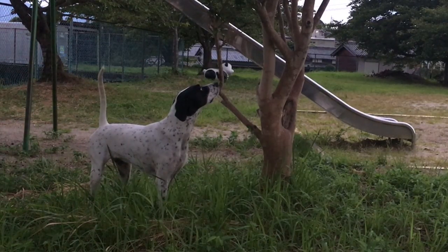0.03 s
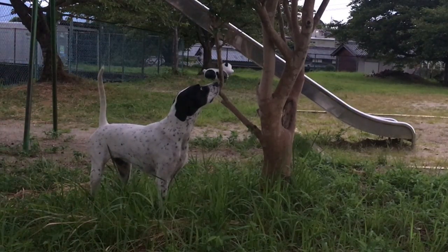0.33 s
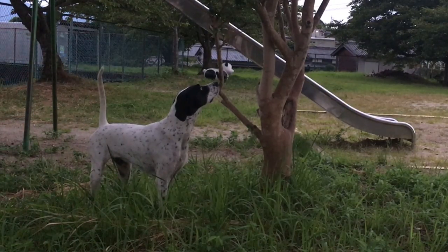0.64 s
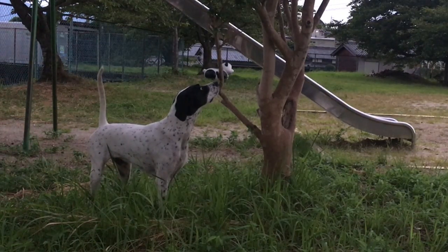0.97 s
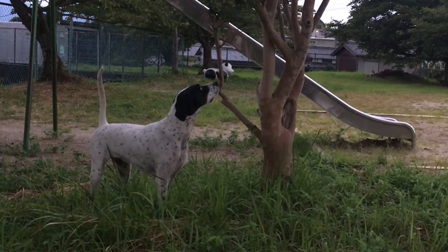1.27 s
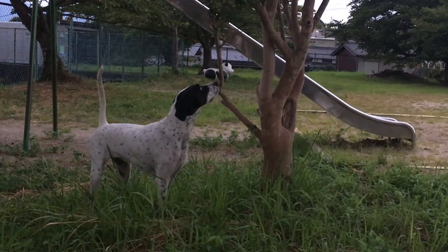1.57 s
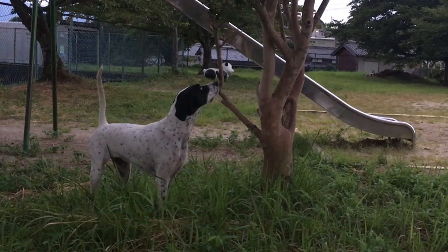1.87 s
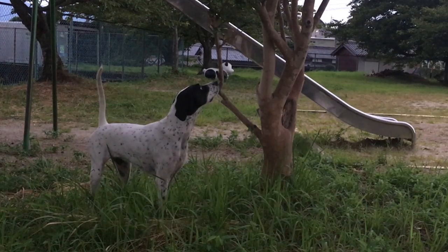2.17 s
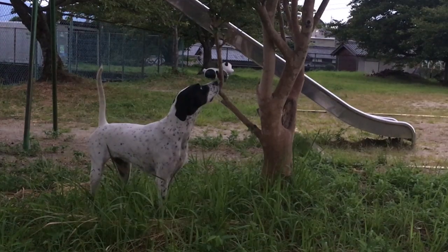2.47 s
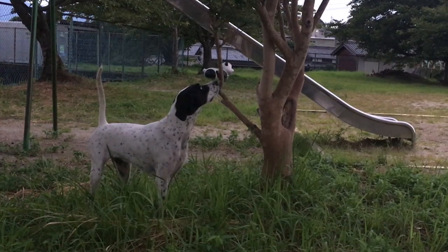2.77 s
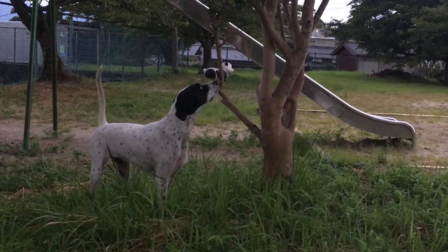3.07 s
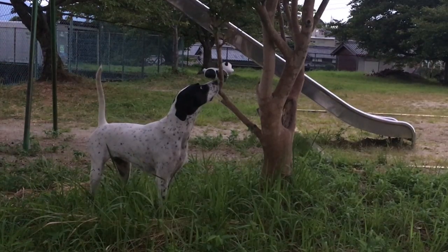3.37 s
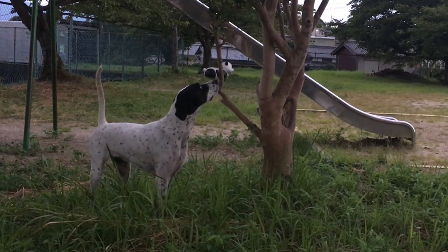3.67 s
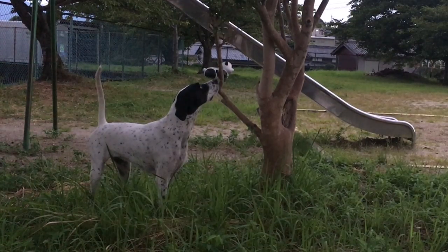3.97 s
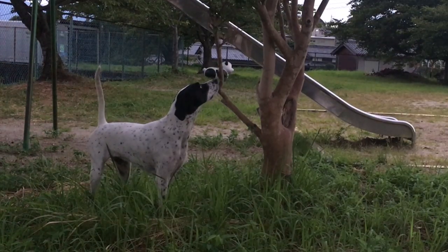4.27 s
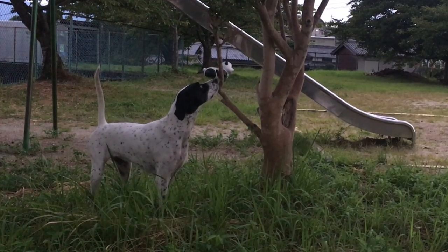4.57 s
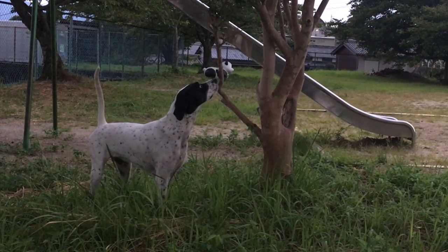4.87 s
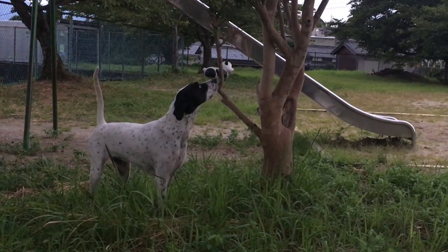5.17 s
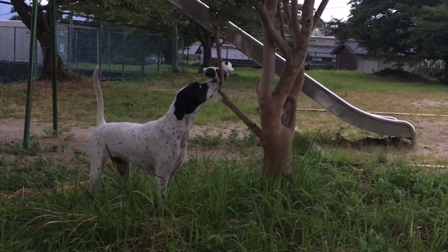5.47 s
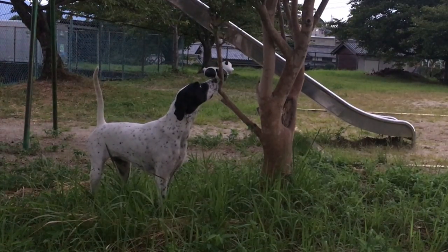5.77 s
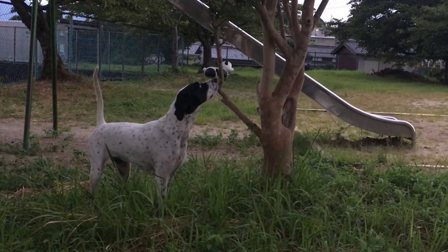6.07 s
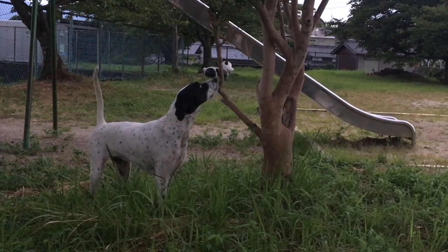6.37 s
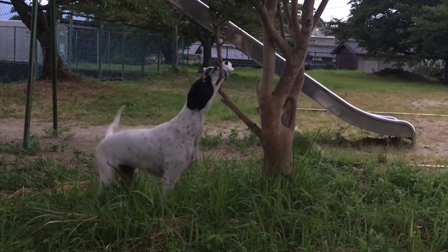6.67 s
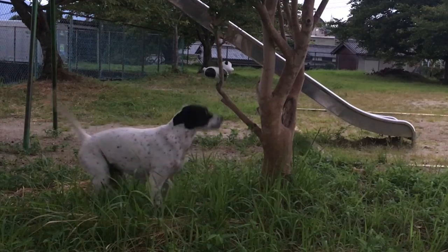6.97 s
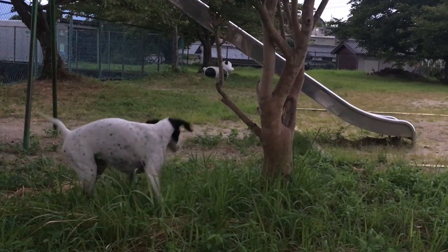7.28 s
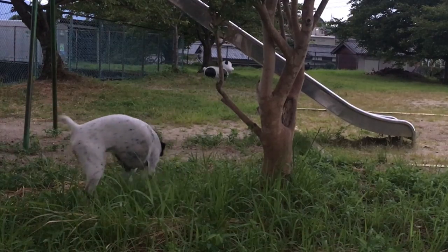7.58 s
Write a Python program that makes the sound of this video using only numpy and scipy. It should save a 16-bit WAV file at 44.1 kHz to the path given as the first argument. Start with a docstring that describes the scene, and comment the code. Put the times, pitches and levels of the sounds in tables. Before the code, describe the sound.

Cicadas buzz loudly in park trees, several near ones pulsing fast over a distant sizzle, with an insect trilling in the grass and a faint low town rumble. After about six seconds the whole sound drops abruptly. A dog snaps at a branch with a brief croaky squeak and cracking twigs, then a disturbed cicada rattles in two bursts over faint crickets and a far bird. The sound is mono.

```python
"""Cicadas in a park

A far chorus and three near cicadas buzz by clicking their tymbals, the ribbed drums on their bodies.
An insect trills in the grass over a low town rumble. The whole sound drops abruptly in level; then a
dog snaps at a branch, there is a brief croaky squeak, twigs crack, and a disturbed cicada rattles in
two bursts, with faint crickets and a far bird behind it. Mono."""
import sys
import numpy as np
from scipy import signal
from scipy.fft import rfft, irfft
from scipy.io import wavfile

SR = 44100
rng = np.random.default_rng(int(sys.argv[2]) if len(sys.argv) > 2 else 0)


def master(y):
    """Save y as 16-bit WAV."""
    cut = np.clip(np.atleast_2d(y).T, -1, 1)
    pcm = np.round(cut * 32767)  # scale
    wavfile.write(sys.argv[1], SR, pcm.astype(np.int16))


N = 340452
T = np.arange(N) / SR
DROP_S, DROP_DB = 6.272, -11.5  # when the whole sound drops, and by how much

# All levels in the tables are relative: the mix and the drop change them later.
# Tone of the far traffic. Each row: frequency in Hz, level in dB.
TRAFFIC_TONE = [(25, -12), (55, 4), (160, -3), (250, -4), (390, -8), (470, -15), (1000, -14), (1700, -25),
                (2300, -12.5), (3000, -18.5), (5000, -19)]
# Loudness of the far traffic. Each row: time in seconds, level in dB.
TRAFFIC_LEVELS = [(0, -55.5), (4.5, -56.5), (6.2, -56.5), (6.4, -55.5), (7.72, -56)]
# Faint ringing notes of the town. Each row: pitch in Hz, width in Hz, level in dB.
TOWN_NOTES = [(862.5, 20, -79), (1346, 77, -75.5), (2577, 160, -68.5)]
# Tone of the rumble. Each row: frequency in Hz, level in dB.
RUMBLE_TONE = [(20, -47), (30, -25), (40, -2), (58, 3), (80, 1), (100, -3.5), (120, -2), (145, -13),
               (300, -40)]
# Loudness of the town's low sounds. Each row: time in seconds, rumble in dB, traffic murmur in dB.
RUMBLE_LEVELS = [(0, -56, -72), (1, -56, -72), (2.2, -56.5, -70), (3.8, -56.5, -73), (4.6, -61.5, -82),
                 (5.1, -81, -65.5), (6.2, -62, -62), (6.4, -60, -66.5), (7.72, -55.5, -75)]
# Puffs of wind. Each row: time in seconds, level in dB.
WIND_PUFFS = [(.64, -49.5), (3.04, -49.5), (4.08, -48.5), (4.24, -48.5), (4.41, -56), (4.64, -50.5),
              (4.93, -52)]
# Notes of far crickets. Each row: pitch in Hz, width in Hz, level in dB.
CRICKET_NOTES = [(3700, 38, -64), (4100, 40, -61)]
# A far bird's whistles. Each row: middle in seconds, half length in seconds, pitch in Hz, level in dB.
BIRD_WHISTLES = [(7.09, 0.055, 2180, -64), (7.245, 0.054, 2240, -61), (7.562, 0.046, 2230, -62)]
# Tone of the far chorus. Each row: frequency in Hz, level in dB.
CHORUS_TONE = [(2900, -29), (3600, -20), (4200, -11), (4900, -7), (5400, 0), (6200, -0.5), (7000, -6),
               (7700, -13), (8700, -16), (10400, -18), (11600, -9), (13000, -13), (15500, -15),
               (17000, -39)]
# Loudness of the far chorus. Each row: time in seconds, level in dB.
CHORUS_LEVELS = [(0, -39), (3, -39), (4.3, -39.5), (5, -38), (6.27, -38.5), (6.32, -38), (7.72, -36)]
# Calls of deeper-voiced cicadas. Each row: time in seconds, level in dB.
DEEP_SWELLS = [(.33, -53), (1.13, -55), (1.62, -53), (2.68, -50), (3.3, -52), (3.64, -53.5), (4.14, -57),
               (4.7, -50.5), (5.57, -50), (5.9, -49.5), (6.14, -50)]
# Trills of the insect in the grass. Each row: start in seconds, end in seconds.
GRASS_TRILLS = [(0, 1.05), (1.12, 2.585), (2.655, 4.155), (4.225, 5.67), (5.735, 7.2), (7.27, 7.72)]
# Short squeaks and cracks. Each row: time in seconds, level in dB, pitch in Hz, ring time in seconds.
SQUEAKS_AND_CRACKS = [(6.5907, -25, 4720, .00042), (6.5998, -17.5, 5300, 0.00037),
                      (6.6021, -26, 4950, 0.00028), (6.631, -23, 8000, 0.000087),
                      (6.6486, -22, 7500, 0.000096), (6.6587, -20, 8400, 0.000099),
                      (6.6673, -14.5, 7350, 0.00011), (6.676, -15.5, 7960, 0.000099),
                      (6.683, -23, 8600, 0.000086), (6.6907, -24, 8500, 0.00012)]
# Soft knocks on the branch. Each row: time in seconds, level in dB.
WOOD_KNOCKS = [(.531, -49.5), (.644, -52), (6.526, -42), (6.6, -48), (6.63, -53), (6.728, -59)]
# The notes the branch rings at. Each row: pitch in Hz, level in dB, seconds to fade by 60 dB.
WOOD_NOTES = [(430, -7, .07), (700, -5, .08), (880, -2, .1), (1114, -4, .12), (1400, -6, .08),
              (1900, -6, .05), (2300, -2, .07)]
# Bursts of the disturbed cicada. Each row: start, end, squawk start and squawk end in seconds,
# then the squawk's first and last pitch in Hz.
ALARM_BURSTS = [(6.9858, 7.44, 7.314, 7.385, 5700, 7000), (7.5032, 7.68, 7.635, 7.68, 6500, 7200)]
# Pitch of its rattle. Each row: time in seconds, pitch in Hz.
ALARM_PITCH = [(6.986, 6760), (7.035, 7160), (7.09, 6560), (7.13, 6800), (7.215, 5970), (7.285, 6940),
               (7.504, 7200), (7.585, 6660)]
# Phrases of the three near cicadas. Each row: singer, start in seconds, end in seconds,
# syllables per second, change in that rate each second, level in dB.
SONG_PHRASES = [("low", .05, 2.3, 11.4, -.38, -42), ("low", 2.383, 3.3, 11.82, -.5, -42.5),
                ("low", 3.32, 4.05, 12.93, .5, -43.5), ("low", 4.104, 4.85, 11.67, -.5, -43),
                ("low", 4.909, 6.27, 13.11, -.1, -42.5), ("mid", .066, 1.78, 10.32, .5, -55),
                ("mid", 1.833, 3.36, 10.56, .34, -54), ("mid", 3.416, 4.2, 12.87, .5, -55.5),
                ("mid", 4.247, 6.27, 11.64, -.18, -52.5), ("high", .042, 1.95, 13.41, -.1, -51.5),
                ("high", 2.002, 4, 13.65, -.38, -53), ("high", 4.042, 6.27, 13.41, -.14, -52.5)]
# Rising squawks of a near cicada, about once a second. Each row: time in seconds, level in dB.
NEAR_SQUAWKS = [(.71, -42), (1.665, -44), (2.73, -43), (3.675, -45), (4.74, -48), (6.125, -45)]


def from_db(db):
    """Turn decibels into a gain to multiply by."""
    return 10 ** (np.asarray(db) / 20)


def rms_one(x):
    """Scale a sound so that its average strength (rms) is 1."""
    return x / np.sqrt(np.mean(x ** 2) + 1e-20)


def read(rows, at=T):
    """Join a table's rows with straight lines and read each column at the given times."""
    seconds, *columns = np.transpose(rows)
    return [np.interp(at, seconds, column) for column in columns]


def drift(turns_per_s):
    """A random wander around zero, typically about 1 in size."""
    points = rng.standard_normal(400)
    return np.interp(T * turns_per_s, np.arange(400), points, period=400) * np.sqrt(1.5)


def colour(x, tone):
    """Shape a sound's lows and highs by (Hz, dB) points; the result has strength 1."""
    hz, db = np.transpose(tone)
    bins_hz = np.maximum(np.arange(N // 2 + 1) * SR / N, 1)
    gains = from_db(np.interp(np.log(bins_hz), np.log(hz), db))
    return rms_one(irfft(rfft(x) * gains, N))


def noise_band(hz, width_hz):
    """Noise filtered twice to keep what lies near one pitch; the result has strength 1."""
    b, a = signal.iirpeak(hz, hz / width_hz, fs=SR)
    return rms_one(signal.lfilter(b, a, signal.lfilter(b, a, rng.standard_normal(N))))


def pings(times, gains, hz, ring_s, samples=140):
    """At each given time a tiny tone swells for the ring time and dies away."""
    times, gains, hz, ring_s = (c.reshape(-1, 1) for c in np.broadcast_arrays(times, gains, hz, ring_s))
    at = np.ceil(times * SR).astype(int) + np.arange(samples)
    age = at / SR - times
    waves = gains * age / ring_s * np.exp(1 - age / ring_s) * np.sin(2 * np.pi * hz * age)
    inside = (at >= 0) & (at < N)
    return np.bincount(at[inside], waves[inside], N)


def leafy_clicks(times, gains, hz, ring_s, echo_db, delay_s, count=4):
    """Each click is followed by its own few echoes from leaves and ground."""
    delays = delay_s * rng.exponential(1, (len(times), count)).T
    echoes = pings(times + delays, gains * from_db(echo_db) / np.sqrt(count), hz, ring_s)
    return pings(times, gains, hz, ring_s) + echoes


def trunk_echoes(x, echo_db=-9, count=24):
    """Short echoes from trunks and buildings boost some pitches and weaken others."""
    out = x.copy()
    for lag in (rng.uniform(.002, .035, count) * SR).astype(int):
        out[lag:] += from_db(echo_db) / np.sqrt(count) * x[:-lag]
    return out


def town(hum_hz=59.2, surge_db=4):
    """A soft wash of far traffic, and a surging engine-like hum that fades away and returns."""
    traffic = colour(rng.standard_normal(N), TRAFFIC_TONE) * from_db(read(TRAFFIC_LEVELS)[0])
    notes = sum(from_db(db) * noise_band(hz, width) for hz, width, db in TOWN_NOTES)
    phase = 2 * np.pi * np.cumsum(hum_hz * (1 + .021 * drift(11))) / SR
    hum = np.sin(phase) * from_db(4.2 * drift(9.2))
    hum += np.sin(2 * phase) * from_db(2 + 2.2 * drift(7))
    rumble = colour(rng.standard_normal(N), RUMBLE_TONE) * from_db(surge_db * drift(14))
    rumble += from_db(-4) * hum
    murmur = noise_band(hz=159, width_hz=62)
    rumble_db, murmur_db = read(RUMBLE_LEVELS)
    return traffic + notes + rumble * from_db(rumble_db - .5) + murmur * from_db(murmur_db)


def wind_puffs(half_length_s=.023):
    """Brief gusts of wind thump softly at the microphone."""
    swells = sum(from_db(db) * np.exp(-((T - s) / half_length_s) ** 2) for s, db in WIND_PUFFS)
    return swells * noise_band(hz=80, width_hz=76)


def crickets():
    """Far crickets hold two thin notes after the drop."""
    return (T > DROP_S) * sum(from_db(db) * noise_band(hz, width) for hz, width, db in CRICKET_NOTES)


def bird():
    """A far bird whistles faintly three times."""
    return sum(from_db(db) * np.exp(-((T - s) / half_length) ** 4) * noise_band(hz, width_hz=90)
               for s, half_length, hz, db in BIRD_WHISTLES)


def far_chorus(clicks_per_s=2500, flutter_db=.91, swell_s=.057, drone_db=-57.5):
    """Many distant tymbals merge into a grainy sizzle; deeper voices swell out of it now and then."""
    clicks = rms_one((rng.random(N) < clicks_per_s / SR) * rng.choice([-1, 1], N))
    sizzle = colour(from_db(-3) * clicks + rng.standard_normal(N), CHORUS_TONE)
    swells = sum(from_db(db) * np.exp(-.5 * ((T - s) / swell_s) ** 2) for s, db in DEEP_SWELLS)
    deep_voices = noise_band(hz=4394, width_hz=1340) * np.hypot(swells, from_db(drone_db))
    return sizzle * from_db(read(CHORUS_LEVELS)[0] + flutter_db * drift(28)) + deep_voices


def grass_insect(hz=9300, strokes_per_s=123, tooth_gap_s=.0012):
    """Each wing stroke scrapes over three tiny teeth; even strokes run together into long trills."""
    strokes = np.concatenate([np.arange(start, end, 1 / strokes_per_s) for start, end in GRASS_TRILLS])
    strokes += .0006 * np.interp(strokes, T, drift(3))
    slip, uneven, detune = rng.standard_normal((3, len(strokes), 3))
    times = strokes[:, None] + tooth_gap_s * (np.arange(3) + .141 * slip)
    gains = from_db(np.array([-51, -45, -51]) + .5 * uneven)  # the middle tooth is loudest
    return pings(times, gains, hz * (1 + .012 * detune), ring_s=.00065, samples=240)


def branch():
    """A brief croaky squeak, then twigs crack; knocks set the wood ringing dully."""
    times, click_db, pitch, ring_s = np.transpose(SQUEAKS_AND_CRACKS)
    clicks = leafy_clicks(times, from_db(click_db), pitch, ring_s, echo_db=-1, delay_s=.0023, count=14)
    wood = np.zeros(N)
    age = T[:SR // 5]
    for hz, note_db, fade_s in WOOD_NOTES:
        knocks = np.zeros(N)
        for s, knock_db in WOOD_KNOCKS:
            at = int(s * SR)
            knocks[at:at + len(age)] += from_db(knock_db + note_db - 60 * age / fade_s)
        wood += knocks * noise_band(hz, width_hz=200)  # rough bark makes each knock a brief scuff
    return clicks + from_db(-5.5) * wood


def disturbed_cicada(strokes_per_s=103.4, rib_gap_s=.0017, rib_step_db=-4, fade_db_per_s=70):
    """Each stroke buckles three ribs in turn; in a squawk the second tymbal joins and the pitch climbs."""
    out = np.zeros(N)
    for start, end, squawk_start, squawk_end, from_hz, to_hz in ALARM_BURSTS:
        times = np.arange(start, end, .5 / strokes_per_s)  # the two tymbals take turns
        first_tymbal = np.arange(len(times)) % 2 == 0
        progress = (times - squawk_start) / (squawk_end - squawk_start)
        squawking = (progress >= 0) & (progress <= 1)
        hz = np.where(squawking, from_hz + (to_hz - from_hz) * progress, read(ALARM_PITCH, times)[0])
        rattle_db = -23 + 8 * np.log2(hz / 6800)  # harder strokes are both higher and louder
        rattle_db -= fade_db_per_s * np.maximum(times - squawk_end, 0)
        rattle_db += 1.5 * np.exp(-(times - start) / .04)  # each burst sets off with harder strokes
        squawk_db = -25.5 + 4 * progress
        gains = from_db(np.where(squawking, squawk_db, rattle_db)) * (first_tymbal | squawking)
        ring_s = np.where(squawking, .00029, .00022)
        for rib in range(3):
            slip, uneven, detune = rng.standard_normal((len(times), 3)).T
            at = times + rib * rib_gap_s * (1 + .19 * slip)
            peak = gains * from_db(rib * rib_step_db + 1.2 * uneven)
            pitch = hz * (1 + detune / 50)
            out += leafy_clicks(at, peak, pitch, ring_s, echo_db=-7, delay_s=.0045)
            out += leafy_clicks(at, peak * from_db(-2), 2 * pitch, ring_s / 2, echo_db=-.5, delay_s=.0039)
    return out


def syllables(singer, slip_s=.003, uneven_db=.6):
    """Time and level of a singer's short buzzes: the beat slowly quickens or slackens in each phrase."""
    rows = []
    for who, start, end, rate, quickening, level_db in SONG_PHRASES:
        if who == singer:
            age = np.arange(0, end - start, .001)
            beats = rate * age + quickening * age ** 2 / 2
            rows += [(start + s, level_db) for s in np.interp(np.arange(beats[-1]), beats, age)]
    return np.array(rows) + rng.standard_normal((len(rows), 2)) * [slip_s, uneven_db]


def cicada(calls, hz, glide, spread, swell_s, clicks_per_s, ring_s, echo_db, uneven_db, overtone_db=None):
    """Tymbal ribs click and make the belly ring; in each call the clicks swell and their pitch glides."""
    middle, level_db = np.transpose(calls)[:, :, None]
    ribs = np.arange(-26, 27)
    slip, uneven, detune = rng.standard_normal((len(calls), 3, len(ribs))).transpose(1, 0, 2)
    offset = (ribs + .3 * slip) / clicks_per_s
    swell = np.exp(-2 * (offset / swell_s) ** 2)
    # longer or denser clicks are made softer, so the call keeps its level
    peak = from_db(level_db + uneven_db * uneven) / np.sqrt(ring_s * clicks_per_s)
    pitch = hz * (1 + glide * np.tanh(offset / swell_s) + spread * detune)
    times, gains, pitch = (middle + offset).ravel(), (peak * swell).ravel(), pitch.ravel()
    voice = leafy_clicks(times, gains, pitch, ring_s, echo_db, delay_s=.005, count=2)
    if overtone_db is not None:
        overtone_gains = gains * from_db(overtone_db)
        voice += leafy_clicks(times, overtone_gains, 2 * pitch, ring_s / 2, echo_db, .0046, count=2)
    return voice / np.sqrt(1 + from_db(echo_db) ** 2)


def near_cicadas():
    """Three singers at their own pitches, and rising squawks that break in about once a second."""
    low = cicada(syllables("low"), hz=6050, glide=.16, spread=.045, swell_s=.033,
                 clicks_per_s=500, ring_s=.00036, echo_db=-1, uneven_db=1.2, overtone_db=-15)
    mid = cicada(syllables("mid"), hz=7850, glide=.1, spread=.015, swell_s=.035,
                 clicks_per_s=520, ring_s=.00045, echo_db=-2, uneven_db=1)
    high = cicada(syllables("high"), hz=14600, glide=-.04, spread=.04, swell_s=.03,
                  clicks_per_s=620, ring_s=.00018, echo_db=0, uneven_db=.8)
    squawks = cicada(NEAR_SQUAWKS, hz=6420, glide=.12, spread=.021, swell_s=.054,
                     clicks_per_s=480, ring_s=.00034, echo_db=-6, uneven_db=1.5, overtone_db=0)
    return from_db(1.2) * low + from_db(4) * (mid + high) + squawks


def scene():
    """All the sounds of the park added up, alike in both channels."""
    song = from_db(-.97) * trunk_echoes(far_chorus() + near_cicadas())
    park = song + grass_insect() + crickets() + bird()
    park = park + disturbed_cicada() + branch() + town() + wind_puffs()
    return np.stack([park, park])


def record(dry):
    """The level dips for an instant and stays lower from then on; the highest treble is cut."""
    level_db = np.interp(T, [DROP_S - .006, DROP_S + .007, DROP_S + .016], [0, -26, DROP_DB])
    cutoff_hz = 15680
    treble_cut = signal.ellip(12, .1, 80, cutoff_hz, fs=SR, output="sos")
    return signal.sosfilt(treble_cut, dry * from_db(level_db))


dry = scene()
out = record(dry)
master(out)
```